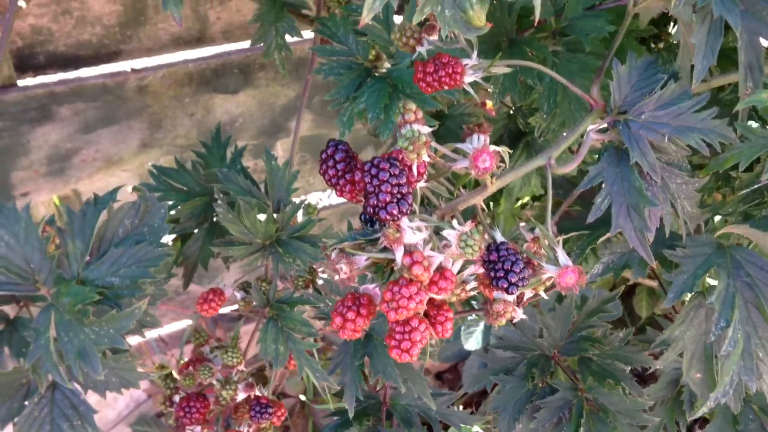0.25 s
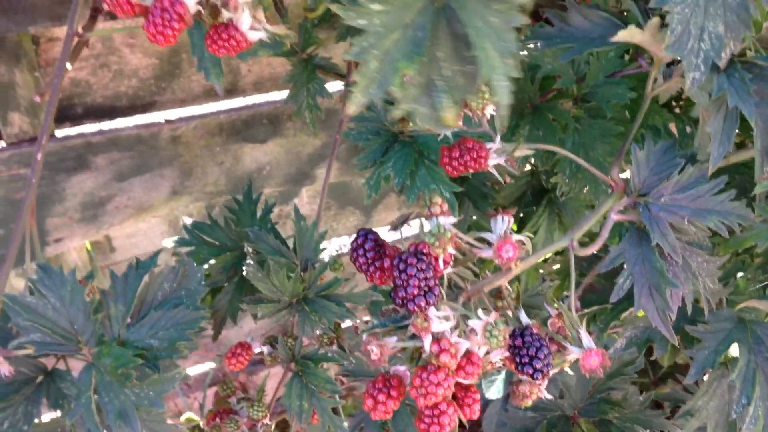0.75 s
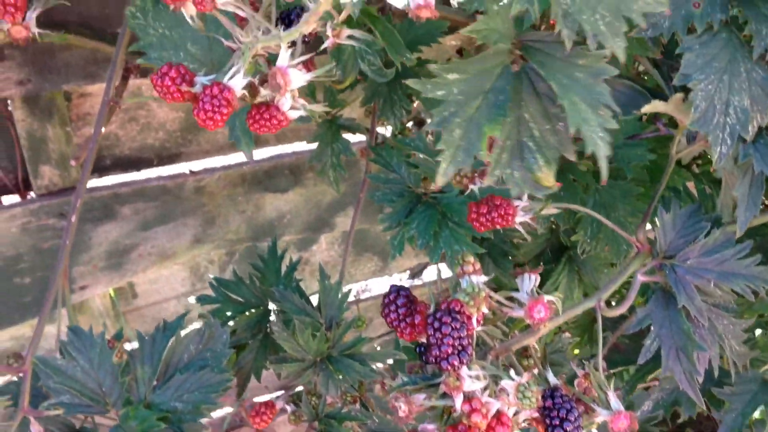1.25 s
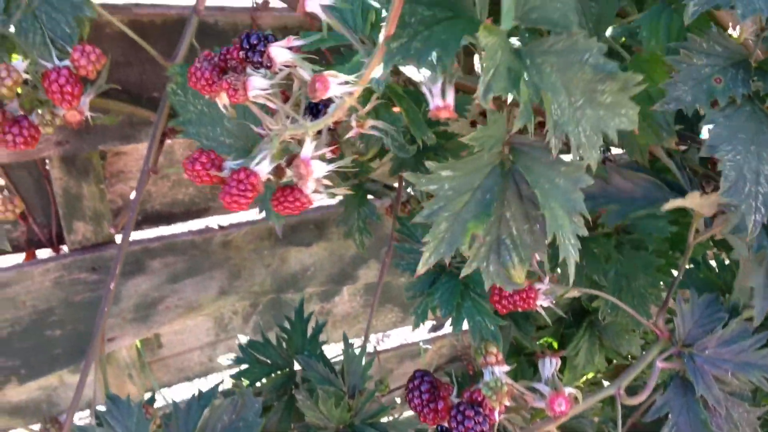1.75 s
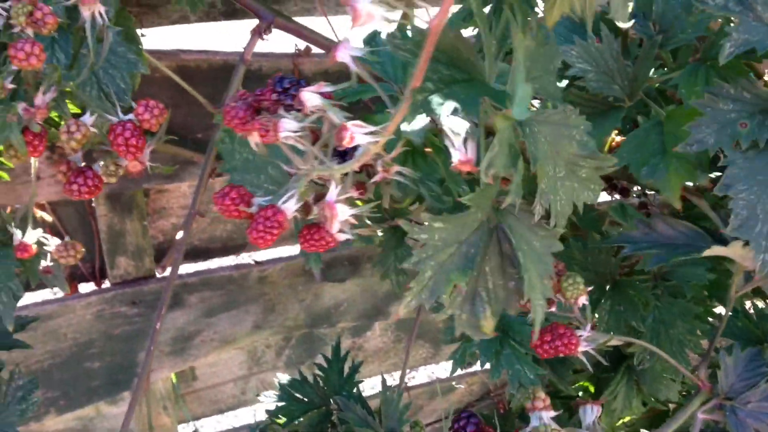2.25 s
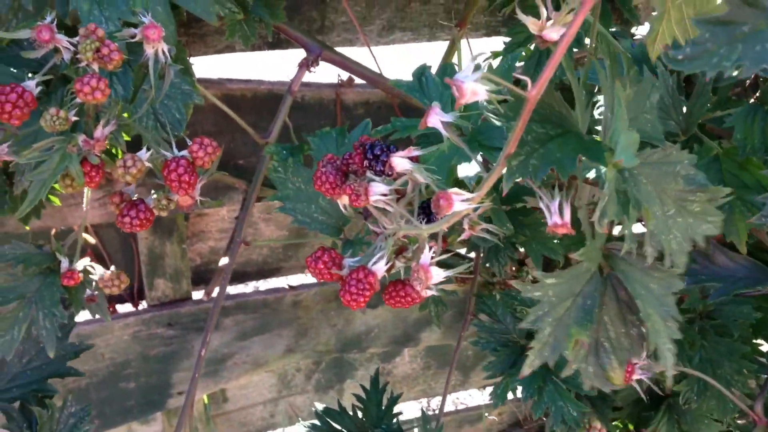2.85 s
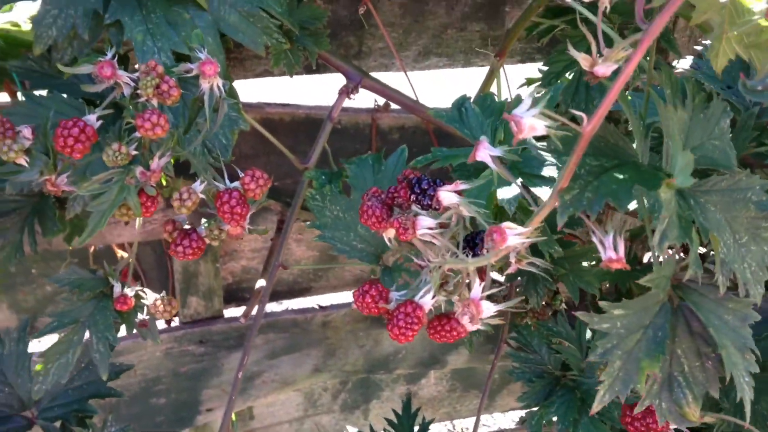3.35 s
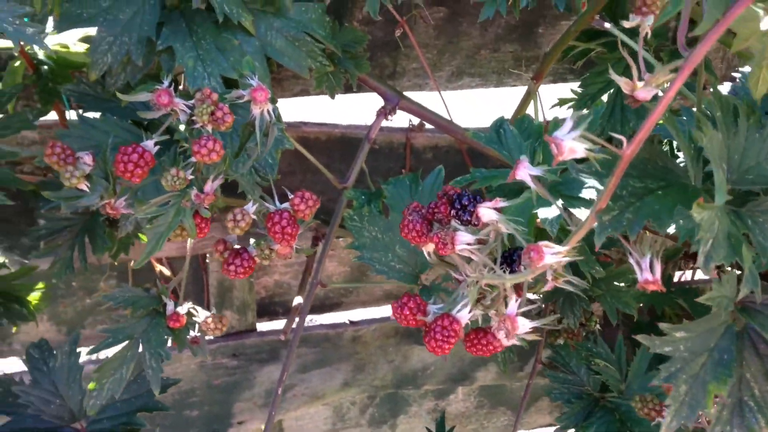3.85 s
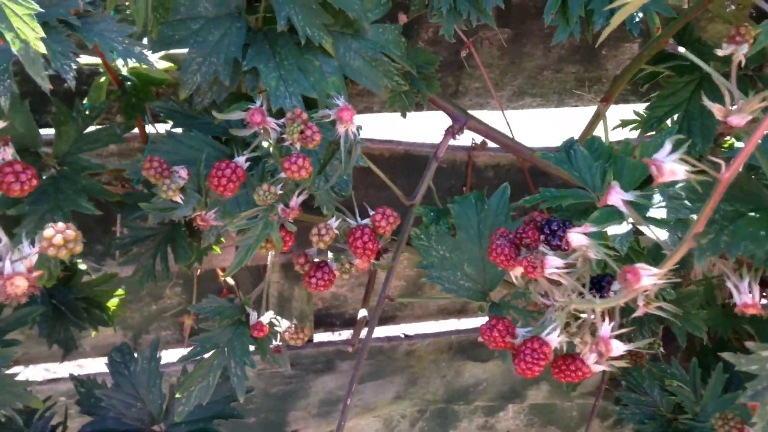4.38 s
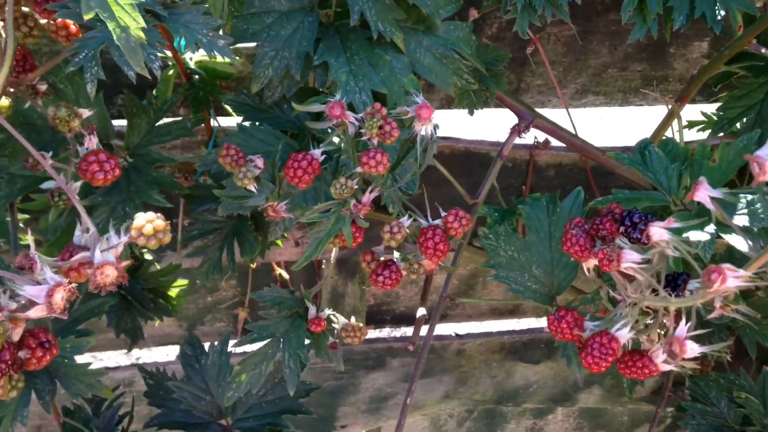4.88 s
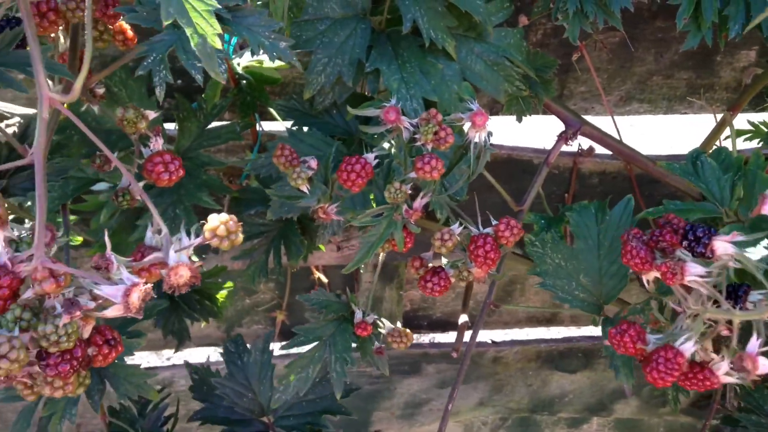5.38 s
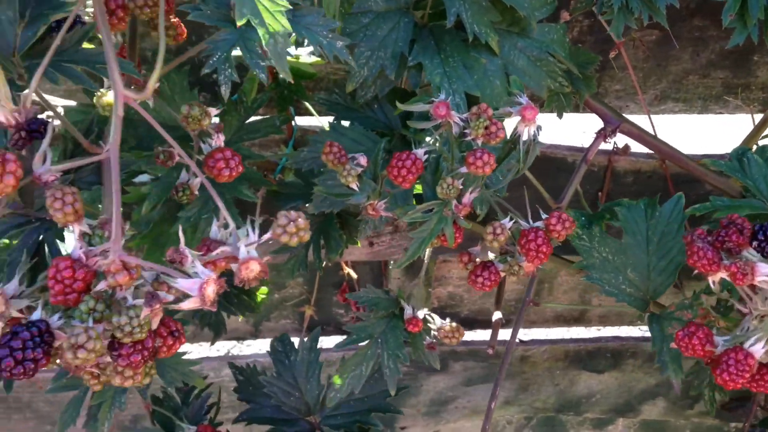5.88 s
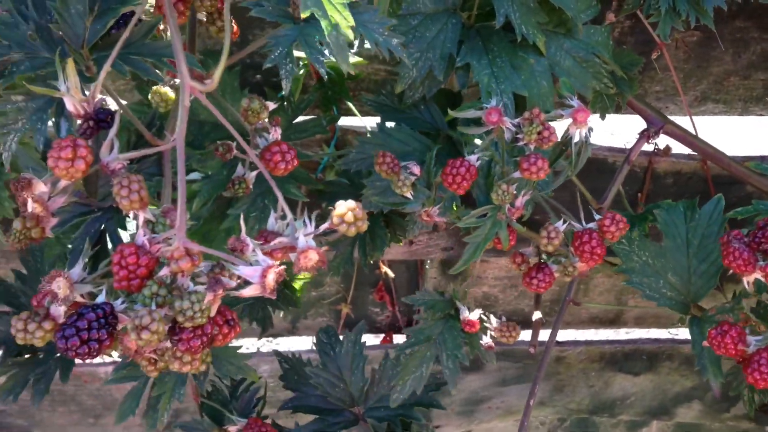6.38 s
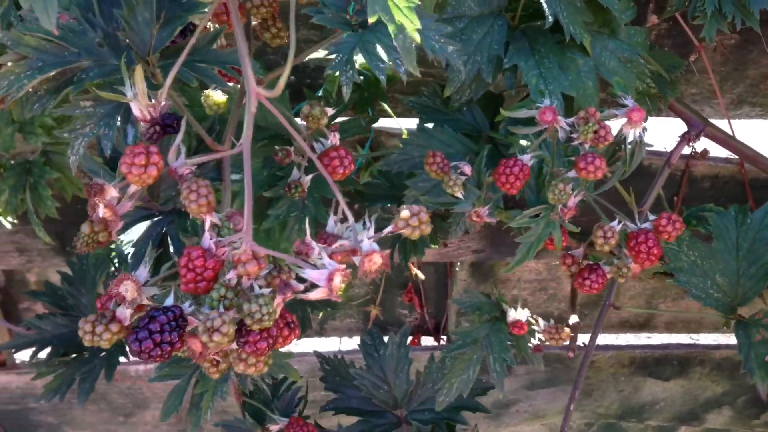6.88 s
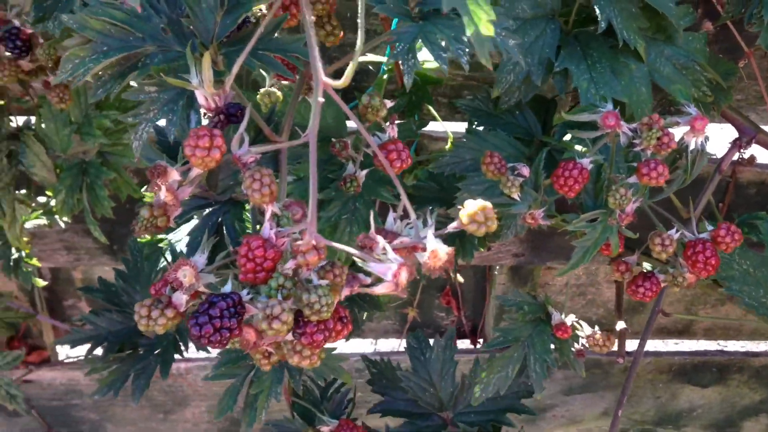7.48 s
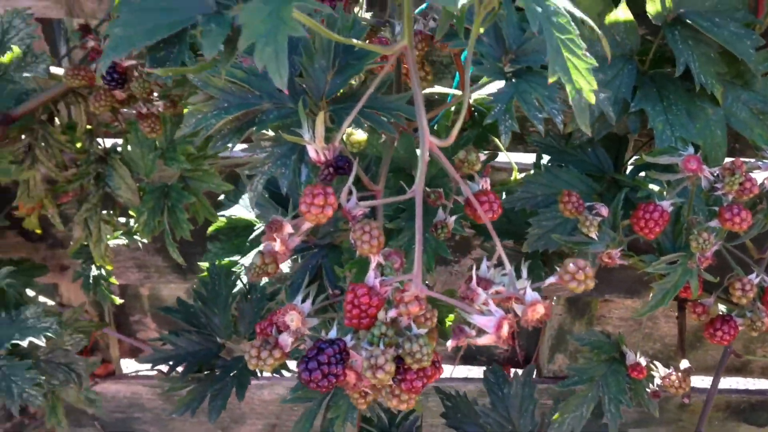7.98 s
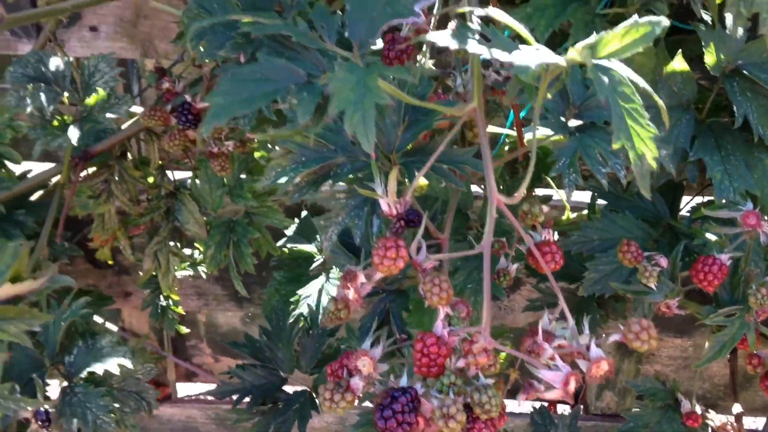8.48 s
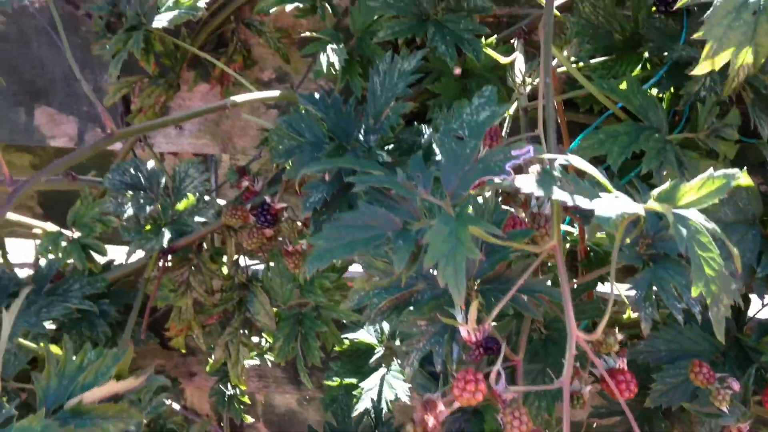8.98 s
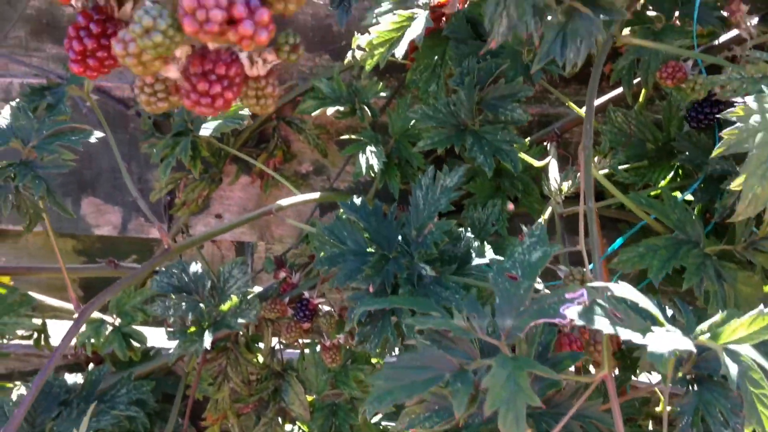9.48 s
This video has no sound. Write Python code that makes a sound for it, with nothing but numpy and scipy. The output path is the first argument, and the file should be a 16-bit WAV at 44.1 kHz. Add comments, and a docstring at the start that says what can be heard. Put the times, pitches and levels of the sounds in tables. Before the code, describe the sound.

Close, mono wind noise in a garden: dull, uneven pressure thuds and fluttering rumbles right on the microphone, over a very faint foliage hiss. Early gusts are moderate and separated by calm, with small dry leaf ticks. The wind then surges into a dense, crackling, distorted roar at about seven seconds, drops briefly, and returns in heavy lumps.

```python
"""Gusts of wind buffet a small handheld microphone among berry bushes.
Eddies tumble over its port as low lumps of pressure: filtered trains of random impulses for the
many small ones, windowed cosines with narrow crests for the strong ones; fast air makes both finer.
Leaves tick against each other and one snaps close by, as bursts of noise whose treble dies first.
Behind them lies a faint hiss of foliage and microphone self-noise, made of coloured noise."""
import sys
import numpy as np
from scipy import signal
from scipy.fft import rfft, irfft
from scipy.io import wavfile
from scipy.ndimage import uniform_filter1d, minimum_filter1d

SR = 44100
rng = np.random.default_rng(int(sys.argv[2]) if len(sys.argv) > 2 else 0)


def dump(signal):
    """Clip the signal to [-1, 1] and save it as 16-bit WAV at the path in sys.argv[1]."""
    limited = np.clip(np.atleast_2d(signal).T, -1, 1)
    pcm = np.round(limited * 32767).astype(np.int16)
    wavfile.write(sys.argv[1], SR, pcm)


N = 429534

# Rushes of air over the port:
# [start t/s, build-up t/s, dying t/s, relative level/dB, extra fineness/dB, extra depth/dB]
RUSHES = [(0.0, .14, 0.13, -40, -4.5, -3.5), (.44, 0.33, 0.6, -34.5, -1, -7.5),
          (1.231, 0.068, 0.065, -34, 0, 4), (1.481, 0.25, 0.17, -25, -1.5, 0.5),
          (1.74, 0.12, 0.072, -21.5, 1.5, -14), (1.929, .07, 0.095, -22, 2, -4.5),
          (2.09, 0.046, .15, -31.5, 3.5, -5.5), (2.28, 0.042, 0.83, -35, 2.5, -5.5),
          (2.98, 0.43, 0.42, -35.5, -4, 2), (3.772, 0.17, 0.15, -24, 0.5, -2),
          (4.14, 0.07, 0.073, -30.5, 0.5, 2.5), (4.28, .08, .08, -22.5, 0.5, 4.5),
          (4.45, 0.035, 0.056, -33, 0, 2), (4.55, 0.099, 0.13, -42.5, -5, 2),
          (4.759, .05, 0.073, -31, -2.5, -1.5), (4.9, 0.056, 0.086, -28.5, -0.5, -2),
          (5.07, 0.087, 0.077, -33, -2, 0), (5.27, 0.053, 0.16, -33, 1, -1), (5.55, 0.27, 0.21, -34, 0, -5),
          (6.15, 0.096, 0.28, -38.5, -5.5, 1), (6.522, 0.046, 0.19, -25.5, 2.5, 0.5),
          (6.821, 0.26, 0.039, -18, 1.5, 0), (7.055, 0.043, 0.062, -11, 1.5, -3),
          (7.232, 0.054, 0.15, -16.5, 4, -4), (7.403, .03, .1, -10, 3.5, -2),
          (7.579, 0.038, 0.054, -12, 3.5, 4), (7.681, 0.028, 0.032, -16.5, 2, -3.5),
          (7.771, 0.047, 0.29, -33, 4.5, 2), (7.989, 0.059, 0.12, -23.5, 0.5, -2),
          (8.15, .07, 0.17, -25, -5.5, 4), (8.369, 0.13, 0.22, -19.5, -1.5, 3),
          (8.719, 0.029, 0.064, -25.5, -5.5, 5.5), (8.83, 0.16, 0.18, -25.5, -4, 2),
          (9.329, 0.12, 0.29, -31, -2, 5)]
LULL_DB = -51  # relative level between rushes
SAG_DB_PER_S, EDGE_S = 29.5, 0.016  # fall away from the loudest moment; softness of start and stop
FINE_DB, FINE_PER_DB = -19., 0.53  # share of fine eddies at level -29 dB, and its growth with level
DEEP_DB, DEEP_PER_DB = -7., -0.3847  # share of deep eddies at level -32.5 dB, likewise
PUFF_S, PUFF_DB = .012, -15.5  # air that swirls around each strong eddy: duration, level below it


def airflow():
    """Superposition of powers: rushes add to a lull, and a puff surrounds every strong eddy."""
    t = np.arange(0, N / SR + .1, .002)
    start, build, dying, db, extra_fine_db, extra_deep_db = np.transpose(RUSHES)[:, :, None]
    rise = (1 + np.tanh((t - start) / EDGE_S)) / 2
    stop = (1 + np.tanh((start + build + dying - t) / EDGE_S)) / 2
    sag_db = SAG_DB_PER_S * abs(t - start - build)
    rush = (rise * stop * gain_of(db - sag_db)) ** 2
    steady = rush.sum(axis=0) + gain_of(LULL_DB) ** 2

    s, eddy_db, sharp_db = np.transpose(EDDIES)[:, :, None]
    puffs = gain_of(eddy_db + PUFF_DB) ** 2 * np.exp(-((t - s) / PUFF_S) ** 2)
    power = steady + puffs.sum(axis=0)
    level_db = 10 * np.log10(power)

    # extras count in proportion to the power of their rush or puff
    rush_fine_db = (rush * extra_fine_db).sum(axis=0) / steady
    puff_fine_db = (puffs * sharp_db).sum(axis=0) / power
    rush_deep_db = (rush * extra_deep_db).sum(axis=0) / steady
    fineness_db = FINE_DB + FINE_PER_DB * (level_db + 29) + rush_fine_db + puff_fine_db
    depth_db = DEEP_DB + DEEP_PER_DB * (level_db + 32.5) + rush_deep_db
    return t, 10 * np.log10(steady), level_db, fineness_db, depth_db


FINE_WANDER_DB, DEEP_WANDER_DB, WANDER_S = 3.5, 4., 0.025  # both shares also drift by chance


def buffeting(corner_hz=480, db_per_octave=16, fall_db=11.5, bend=2.15, eddies_per_s=900,
              spread_db=-0.5, lumps_db=3.5):
    """Turbulent cascade: dense small eddies in clumps, reaching higher in frequency the finer they are."""
    size = gain_of(spread_db * np.minimum(rng.exponential(1, N), 5)) * rng.standard_normal(N)
    train = size * (rng.random(N) < eddies_per_s / SR)
    train = train * gain_of(lumps_db * wander(0.011))  # clumps
    train = train * gain_of(1.5 * wander(.035))  # separate puffs
    hz, t, z = signal.stft(evened(train), SR, nperseg=1024, noverlap=896)
    hz = hz[:, None]

    s, _, level_db, fine_db, deep_db = airflow()
    at = np.minimum(s * SR, N - 1).astype(int)
    fine_db = fine_db + FINE_WANDER_DB * wander(WANDER_S)[at]
    deep_db = deep_db + DEEP_WANDER_DB * wander(WANDER_S)[at]

    # friction wipes out the smallest eddies: ever steeper
    corner = corner_hz * 2 ** np.interp(t, s, (fine_db + 19) / db_per_octave)
    friction_db = -fall_db * (hz / corner) ** bend
    bass_db = (np.interp(t, s, deep_db) + 8.5) / (1 + (hz / 120) ** 4)
    # fast air tears into a rough spray
    spray_db = -23.5 + 1.96 * np.interp(t, s, level_db + 18.0) - 11 * hz / 1000
    shape = gain_of(friction_db + bass_db) + gain_of(spray_db)
    shape = shape / np.sqrt((shape ** 2).mean(axis=0))  # even spectral power in every frame

    air = signal.istft(z * shape, SR, nperseg=1024, noverlap=896)[1][:N]
    return air * gain_of(np.interp(np.arange(N) / SR, s, level_db) + 2.0)


# Strong single eddies: [t/s, relative level/dB, extra sharpness/dB]
EDDIES = [(0.146, -30.5, 5), (0.392, -28.5, 1.5), (0.461, -25, -1), (0.623, -19.5, -1), (0.771, -13.5, -5),
          (0.856, -28, 0.1), (1.275, -16, -5.5), (1.301, -11.5, 0.7), (1.567, -12, -3), (1.598, -7, 2.1),
          (1.646, -12.5, 2), (1.7, -12.5, 4.5), (1.789, -10, -4), (1.812, -6, 7), (1.841, -7, 6),
          (1.859, -8, 0.1), (1.901, -4.5, -1.5), (1.974, -7, -0.5), (1.998, -8, -0.5), (2.041, -11, 3.5),
          (2.342, -20.5, 1), (2.632, -18, 0.1), (2.744, -26, -3), (3.215, -23.5, 1), (3.409, -30, -8),
          (3.795, -10.5, 0.1), (3.851, -6, -4), (3.908, -15, -2), (4.033, -12, 3), (4.17, -10.5, 0.1),
          (4.253, -17.5, -2), (4.328, -7, -2.5), (4.392, -8, -2.5), (4.409, -4.5, 0.5), (4.5, -25, -12),
          (4.796, -16.5, -2), (4.92, -19, 5.5), (4.997, -12, 0.5), (5.131, -20.5, 0.1),
          (5.352, -15.5, -0.2), (5.497, -21.5, -4), (5.581, -14.5, 0.5), (5.675, -17.5, -5),
          (5.742, -6.5, 1.5), (5.853, -11, 1.2), (5.967, -13, -2.5), (6.249, -24, 2.5), (6.455, -22, 0.5),
          (6.631, -0.5, -0.8), (6.696, -9.5, -2), (6.857, -11.5, 2.5), (6.962, -7.5, -1),
          (7.007, -0.5, 0.8), (7.024, -0.5, 1.5), (7.062, -0.5, 2.5), (7.073, -3, -1), (7.093, -4, 4),
          (7.103, 2, 18), (7.131, -2.5, 4), (7.186, -2, 0.5), (7.288, -8.5, 1), (7.413, -3.5, -0.5),
          (7.437, -9, -1), (7.454, -12, 4.5), (7.471, -7.5, 0.1), (7.508, -4.5, 5.5), (7.611, 2.5, 1.8),
          (7.639, 0, 6.5), (7.7, 2.5, 1.7), (7.717, 0.5, 2), (8.028, -14, 10), (8.118, -13.5, -3),
          (8.208, -11, -2), (8.287, -6, 3.5), (8.381, -12, 2.5), (8.476, -8, -2), (8.506, 0.5, 3.5),
          (8.547, 0, 0.3), (8.639, -8.5, 7.5), (8.661, -2.5, 5.7), (8.843, -7.5, 1), (8.952, -18, 3),
          (9.011, -11.5, -5), (9.098, -1, 0.3), (9.19, -6.5, 0.5), (9.443, -17, -7), (9.507, -12, 0.3),
          (9.555, -9, 0.7)]
# pitch and crest half-width at the usual fineness, before chance; an octave finer for every FINER_DB
EDDY_HZ, CREST_MS, FINER_DB = 275.5, 0.64, 12.5
THINNEST_MS = .14
LESSER_PER_S = 12.  # lesser eddies by chance
LESSER_DB, LESSER_SPREAD_DB = 6.5, 4.5  # their level over that of the rush, and its spread either way


def eddy_rows():
    """Advection scaling: the finer the air, the higher an eddy's pitch and the thinner its crest."""
    t, steady_db, _, fine_db, _ = airflow()
    at, size = rng.random((int(LESSER_PER_S * N / SR), 2)).T
    at = .05 + at * (N / SR - .1)
    lesser_db = np.interp(at, t, steady_db) + LESSER_DB + LESSER_SPREAD_DB * (2 * size - 1)
    lesser = np.transpose([at, lesser_db, 0 * at])
    s, db, sharp_db = np.vstack([EDDIES, lesser]).T

    finer = 2 ** ((np.interp(s, t, fine_db) + sharp_db - FINE_DB) / FINER_DB)
    pitch, thin = rng.uniform(-0.89, 1, (len(s), 2)).T
    eddy_hz = EDDY_HZ * finer * 2 ** (.3 * pitch)
    crest_ms = np.maximum(CREST_MS / finer * 2 ** (0.19 * thin), THINNEST_MS)
    return np.transpose([s, db, eddy_hz, crest_ms])


def eddies(turns=0.54, crest_share=0.81, ripple=0.66, mostly_up=.75):
    """Vortex pressure pulse: a round lump of a cycle or two, with a narrow crest and smaller ripples."""
    out = np.zeros(N)
    t = np.arange(-800, 800) / SR
    rows = eddy_rows()
    chances = 2 * rng.random((len(rows), 22)) - 1
    for (s, db, hz, crest_ms), (side, lean, *ripples) in zip(rows, chances):
        window = np.exp(-.5 * (t * hz / turns) ** 2)
        swing = np.cos(2 * np.pi * (t * hz + 0.14 * lean))
        # ten ripples within 13 ms, weaker further out; the crest itself at the centre
        place, strength = np.reshape(ripples, (2, -1))
        size = np.append(ripple * strength * (1 - abs(place)), 1)[:, None]
        at = np.append(.013 * place, 0)[:, None]
        crests = (size / (1 + ((t - at) * 1000 / crest_ms) ** 2)).sum(axis=0)
        lump = (1 - crest_share) * window * swing + crest_share * np.hanning(len(t)) * crests
        sign = np.sign(2 * mostly_up - 1 - side)  # positive with probability mostly_up
        add(out, s + t[0], gain_of(db) * lump * sign)
    return out


# Leaves brushing leaves, the loudest a snap:
# [t/s, relative level/dB, centre f/Hz, nominal decay time to -60 dB at 4 kHz t/s]
TICKS = [(2.16, -50.5, 5460, 0.18), (2.664, -44.5, 1900, 0.081), (3.58, -39.5, 3940, 0.11),
         (3.949, -52, 6500, 0.16), (4.689, -45, 4260, .2), (5.214, -47, 5500, .15),
         (5.435, -50, 6000, 0.22), (5.641, -49, 5470, 0.36), (5.801, -37.5, 2770, 0.04),
         (5.889, -48.5, 1780, .1), (6.006, -50, 5000, 0.099), (6.249, -51, 4700, .14),
         (6.412, -51, 2500, .12), (6.5, -40.5, 3470, 0.12), (6.897, -21.5, 2000, 0.21),
         (6.985, -38, 3050, 0.098), (8.655, -49, 6000, 0.28), (8.891, -43.5, 4640, 0.084),
         (8.959, -51, 4100, 0.23)]
TICK_FALL_DB, WIDER_PER_DB = 9.5, 0.22  # fall one octave off centre at -45.5 dB; harder is wider
TICK_RISE_S = 0.0072  # start of a -44 dB tick, harder ones quicker
SMALL_TICKS_PER_S, SMALL_TICK_DB = 2., -55  # faint ticks by chance; level of the faintest


def ticks(patchy_db=3.0, hold=1.13):
    """Frequency-dependent damping: patchy crackle around each leaf's own tone loses its treble first."""
    out = np.zeros(N)
    chance = rng.random((int(SMALL_TICKS_PER_S * N / SR), 4))
    small = chance * [N / SR, 6., 4000., .1] + [0, SMALL_TICK_DB, 2500., .05]
    for s, db, centre_hz, t60 in np.vstack([TICKS, small]):
        hz, t, z = signal.stft(rng.standard_normal(16384), SR, nperseg=128)
        hz = hz[:, None]
        patches = uniform_filter1d(rng.standard_normal(z.shape), 3, axis=0)
        patches = evened(uniform_filter1d(patches, 4, axis=1))
        fall_db = max(TICK_FALL_DB - WIDER_PER_DB * (db + 45.5), 1)
        colour = gain_of(-fall_db * np.log2(np.maximum(hz, 100) / centre_hz) ** 2)
        decay_db = -60 * (t / max(t60, .01)) ** hold * (hz / 4000) ** 0.87
        crackle = z * evened(colour) * gain_of(patchy_db * patches + decay_db)
        burst = signal.istft(crackle, SR, nperseg=128)[1]
        quickness = gain_of(0.27 * (db + 44))
        rise = np.minimum(np.arange(len(burst)) / SR / TICK_RISE_S * quickness, 1)
        add(out, s, gain_of(db - 4.5) * burst * rise)
    return out


# Spectrum of garden hiss and microphone self-noise: [f/Hz, relative density level/dB]
HISS = [(30, -12), (100, -30.5), (300, -0.5), (900, 1), (1400, -3), (2060, -7), (4290, -7), (9190, -16),
        (14700, -18.5), (16000, -17.5)]
HISS_DB = -57


def hiss():
    """Incoherent sum of far foliage: coloured noise that swells slowly and flutters a little."""
    f, level_db = np.transpose(HISS)
    hz = np.fft.rfftfreq(N, 1 / SR)
    colour_db = np.interp(np.log(hz + 1), np.log(f + 1), level_db)  # on a log-frequency axis
    swell_db = 0.87 * wander(0.38)
    flutter_db = 0.37 * wander(0.0083)
    noise = irfft(rfft(rng.standard_normal(N)) * gain_of(colour_db), N)
    return gain_of(HISS_DB + swell_db + flutter_db) * evened(noise)


def gain_of(db):
    """Logarithmic level: decibels to an amplitude factor."""
    return 10 ** (np.asarray(db) / 20)


def evened(x):
    """Normalisation: scales to rms 1."""
    return x / np.sqrt(np.mean(x ** 2) + 1e-20)


def wander(seconds):
    """Low-pass random process: smooth chance of rms 1 that changes over the given time."""
    size = max(int(seconds * SR), 2)
    return evened(uniform_filter1d(uniform_filter1d(rng.standard_normal(N), size), size))


def add(mix, s, sound):
    """Linear superposition: mixes a sound in at a time."""
    part = mix[round(s * SR):][:len(sound)]
    part += sound[:len(part)]


def scene():
    """Superposition of all pressures that reach the port."""
    return (buffeting() + eddies() + ticks() + hiss())[None]


EDGE_HZ = 15400  # upper band limit


def record(dry):
    """Transducer chain: bass cut, asymmetric diaphragm, gain control, limiter and band limit."""
    x = signal.sosfilt(signal.butter(3, 52, "high", fs=SR, output="sos"), dry)
    x = x + .08 * x ** 2  # the diaphragm leans one way: even-order distortion
    x = signal.sosfilt(signal.butter(2, 35, "high", fs=SR, output="sos"), x)

    # gain control ducks on the loudest gusts; its detector recovers 5 dB a second
    power_db = 10 * np.log10(abs(uniform_filter1d(x[0] ** 2, 1800)) + 1e-12)
    fall = np.arange(N) * 5. / SR
    held_db = np.maximum.accumulate(power_db + fall) - fall
    over_db = np.maximum(held_db + 15.5, 0)
    x = x / gain_of(.6 * uniform_filter1d(over_db, 900))

    # limiter: gain follows the highest crest within 5 ms either side, smoothed
    excess = np.maximum(abs(x) / .95, 1)
    crests = -minimum_filter1d(-excess, size=441)
    x = x / uniform_filter1d(crests, size=441)
    band = signal.firwin(1023, EDGE_HZ, window=("kaiser", 9), fs=SR)
    return signal.oaconvolve(x, band[None], "same")


dry = scene()
out = record(dry)
dump(out)
```